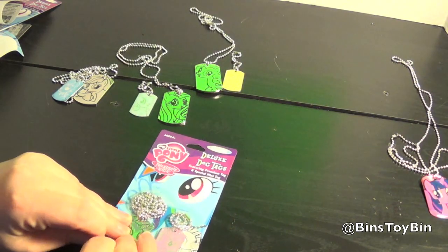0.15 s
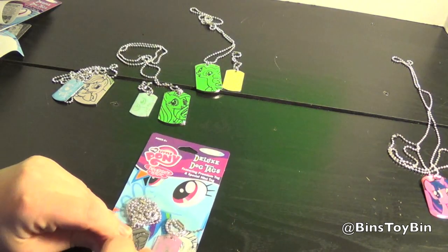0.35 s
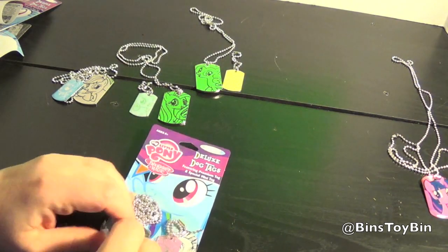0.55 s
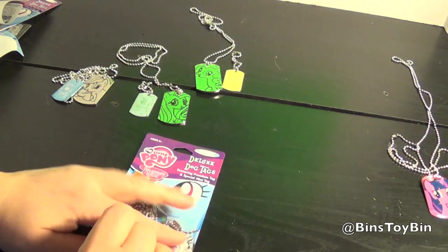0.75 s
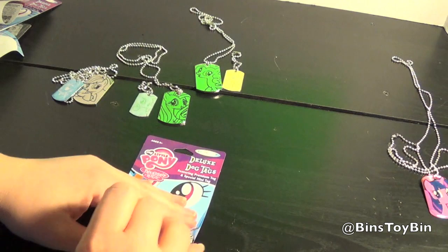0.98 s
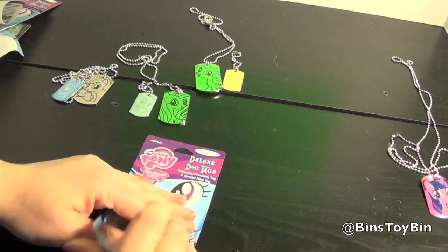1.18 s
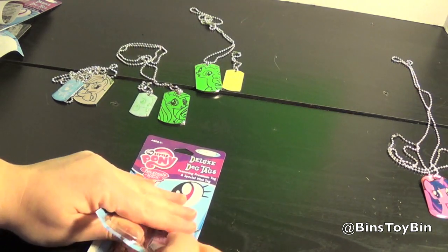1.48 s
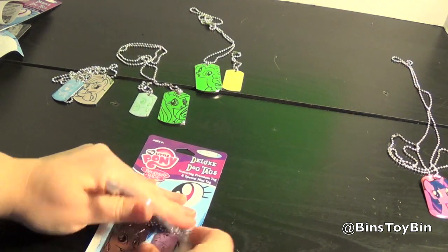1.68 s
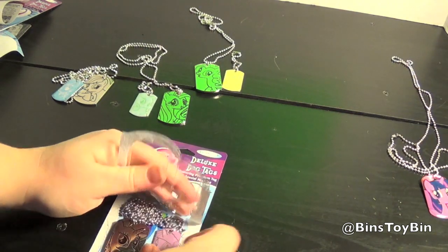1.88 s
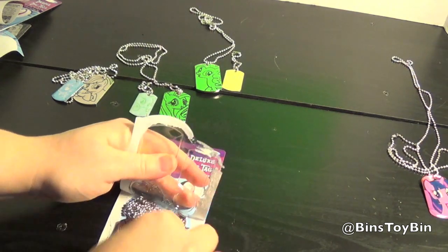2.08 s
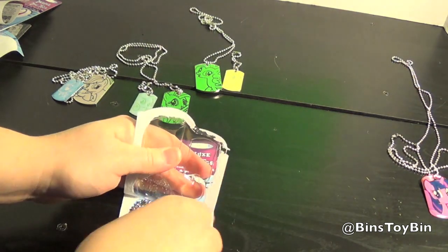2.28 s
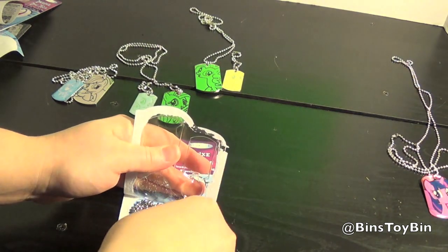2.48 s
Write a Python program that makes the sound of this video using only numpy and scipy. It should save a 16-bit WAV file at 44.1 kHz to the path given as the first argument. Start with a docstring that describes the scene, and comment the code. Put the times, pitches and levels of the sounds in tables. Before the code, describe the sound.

A stiff plastic blister pack is pried open close to the microphone: sharp snaps and tearing crackles in quick bursts, hollow pops, a brief creak midway, soft table thuds, in a small quiet room.

```python
"""In a small quiet room, hands pry open a stiff plastic blister pack on a table, close to the microphone.
The shell snaps and the bubble pops: each is a handful of short damped tones. The glued rim tears off
the card in crackling bursts made of thousands of tiny cracks. The hollow bubble creaks by sticking and
slipping, and the card bumps the table with soft thuds. Decaying noise tails make the room's answer;
filtered noise makes the air and a fuzzy low hum."""
import sys
import numpy as np
from scipy import signal
from scipy.fft import rfft, irfft, next_fast_len
from scipy.io import wavfile
from scipy.ndimage import uniform_filter1d

SR = 44100
rng = np.random.default_rng(int(sys.argv[2]) if len(sys.argv) > 2 else 0)


def boost_factor(decibels):
    """Convert a level in decibels to a linear amplitude factor."""
    exponent = np.asarray(decibels, float) / 20
    return 10 ** exponent


def dump_mix(stems):
    """Bounce the given channels to the path in sys.argv[1] as a 16-bit WAV at rate SR."""
    frames = np.atleast_2d(stems).T  # one column per channel
    limited = np.clip(frames, -1, 1)  # hard clip at full scale
    pcm = np.round(limited * 32767).astype(np.int16)
    wavfile.write(sys.argv[1], SR, pcm)


N = 116865

# Parts of the pack: centre_hz, spread_octaves, ring_cycles, snap_db (added to the level of single snaps)
SHELL = (3529, 0.6677, 4.5, -5)
FILM = (10470, 0.25, 5.65, 4.1)
BUBBLE = (1390, 0.16, 7, -3)
CARD = (650, 0.58, 2.5, -3)
CARD_DB = -7  # the card drums along with the bubble, at this level relative to it


def unit(x):
    """Scales a sound to an rms of 1."""
    return x / np.sqrt(np.mean(x ** 2) + 1e-20)


def along(points, hz):
    """Reads a curve of (Hz, value) points on a log frequency axis."""
    f, v = np.transpose(points)
    return np.interp(np.log(hz + 1), np.log(f + 1), v)


def filtered(x, response):
    """Multiplies the spectrum of x by a response that depends on frequency."""
    m = next_fast_len(N + 8192)
    return irfft(rfft(x, m) * response(np.fft.rfftfreq(m, 1 / SR)), m)[..., :N]


def grains(start_s, hz, cycles, size, count=400):
    """Adds up damped sines that rise over about a cycle and fall by a factor e every cycles / 2 periods."""
    t = np.arange(count) / SR
    turns = np.clip(hz, 50, SR / 2.5)[:, None] * t
    rise = 1 - np.exp(-turns / 0.5)
    rows = size[:, None] * np.sin(2 * np.pi * turns) * np.exp(-2 * turns / cycles) * rise
    at = np.round(start_s * SR).astype(int)[:, None] + np.arange(count)
    return np.bincount(at.ravel(), rows.ravel(), N + SR)[:N]


def air():
    """Room tone and hiss are shaped noise, partly alike in both ears; a narrow band of noise is the hum."""
    # Colour of the air: pitch_hz [Hz], level_db [dB, relative]
    air_colour = [(41, -34), (70, -4), (511, -1.5), (900, -4), (1260, -9.5), (14500, -20)]
    # How alike left and right are: pitch_hz [Hz], likeness [0 to 1]
    air_alike = [(60, .99), (1000, 0.6), (10000, 0.85)]
    air_db, hum_db = -52, -64.5  # rms
    hum_hz, hum_half_width_hz = 51.8, 10.6

    def colour(hz):
        # the angle shares the noise between middle and side
        angle = np.arccos(np.clip(along(air_alike, hz), 0, 1)) / 2
        return boost_factor(along(air_colour, hz)) * [np.cos(angle), np.sin(angle)]

    mid, side = filtered(rng.standard_normal((2, N)), colour)
    hiss = unit(np.array([mid + side, mid - side]))
    hum = filtered(rng.standard_normal(N), lambda hz: 1 / (1 + ((hz - hum_hz) / hum_half_width_hz) ** 4))
    return boost_factor(air_db) * hiss + boost_factor(hum_db) * unit(hum)


def tearing():
    """Fibres and glue let go in thousands of tiny clumped cracks; each excites shell, bubble, film and card."""
    # Bursts of tearing and crinkling: start_s [s], length_s [s], then the levels of three parts:
    # shell_db [dB], bubble_db [dB], film_db [dB]
    bursts = [(0.082, 0.04, -42.5, -61, -43), (0.239, 0.022, -25.5, -38.5, -25.5),
              (0.269, 0.04, -20, -29.5, -22), (0.304, 0.034, -29.5, -41, -34),
              (0.484, 0.066, -34.5, -41.5, -53), (0.592, 0.04, -33, -36, -31),
              (0.669, 0.031, -32.5, -44, -39), (0.722, 0.038, -21.5, -35.5, -25.5),
              (0.784, 0.049, -29.5, -37, -30), (0.833, 0.072, -28, -32.5, -27.5),
              (0.93, 0.039, -33, -35.5, -32.5), (0.986, 0.02, -22.5, -29, -27),
              (1.01, 0.064, -32.5, -41.5, -34), (1.083, 0.065, -39, -45, -39.5),
              (1.14, 0.026, -25, -32, -26.5), (1.176, 0.015, -26.5, -52, -31),
              (1.256, 0.02, -29.5, -29.5, -34.5), (1.308, 0.01, -25.5, -31.5, -31.5),
              (1.331, 0.027, -38, -37.5, -47), (1.389, 0.25, -42.5, -43, -47.5),
              (1.562, 0.07, -33.5, -32, -41.5), (1.626, 0.06, -20.5, -28.5, -31.5),
              (1.695, 0.035, -31, -38, -32), (1.724, 0.019, -20.5, -27, -21),
              (1.747, 0.065, -24.5, -32.5, -23.5), (1.812, 0.067, -34, -52, -30.5),
              (1.945, 0.02, -25.5, -67, -23.5), (1.978, 0.011, -21, -31.5, -23.5),
              (2.005, 0.012, -32, -39, -29), (2.06, 0.15, -38.5, -45, -39),
              (2.228, 0.04, -28.5, -65, -29.5), (2.28, 0.094, -33, -72.5, -28.5),
              (2.33, 0.028, -24, -42, -36), (2.353, 0.04, -35.5, -53, -34.5),
              (2.613, 0.029, -58, -67, -46.5)]
    attack_s, release_s = 0.0036, 0.0041
    rustle_db = -53.5  # a steady rustle in each part, under the bursts
    sizes_db, clumps_db = 2, 1.7  # how unequal single cracks and clumps of 12 are

    start_s, length_s, shell_db, bubble_db, film_db = np.transpose(bursts)[..., None]
    t = np.arange(N) / SR
    rise = np.clip((t - start_s) / attack_s, 0, 1)
    shape = rise * np.exp(-np.clip(t - start_s - length_s, 0, 1) / release_s)

    when = np.sort(rng.uniform(0, N / SR, 12000))
    clumps = np.repeat(rng.standard_normal(1000), 12)
    strength = boost_factor(sizes_db * rng.exponential(1, len(when)) + clumps_db * clumps)

    out = 0
    parts = ((shell_db, SHELL), (bubble_db, BUBBLE), (film_db, FILM), (bubble_db + CARD_DB, CARD))
    for level_db, (hz, spread, cycles, _) in parts:
        place, push = rng.standard_normal((2, len(when)))
        size = strength * push * 2 ** (spread * place / 2)
        cracks = grains(when, hz * 2 ** (spread * place), cycles, size, count=320)
        # most of the slow swings in level are evened out before the bursts are shaped
        even = cracks / np.abs(uniform_filter1d(cracks ** 2, size=900)) ** 0.4
        loudness = (boost_factor(level_db) * shape).max(axis=0) + boost_factor(rustle_db)
        out = out + unit(even) * loudness
    return out


def room(x):
    """Echoes fade as noise tails, drawn anew every eighth of a second as the hands move."""
    # Time to fade by 60 dB: pitch_hz [Hz], fade_s [s]
    fade_times = [(300, 0.23), (1500, 0.12), (5000, 0.19), (12000, 0.089)]
    # Level of the side sound: pitch_hz [Hz], level_db [dB, relative]
    side_level = [(200, -14), (1000, -16), (4000, -3.5), (8000, -15.5)]
    out, step = np.zeros((2, N + SR)), SR // 8
    for start in range(0, N, step):
        hz, t, z = signal.stft(rng.standard_normal((2, SR // 3)), SR, nperseg=256)
        fade = boost_factor(-60 * t / along(fade_times, hz)[:, None])
        tail = signal.istft(z * fade, SR, nperseg=256)[1]
        wet = signal.fftconvolve(x[None, start:start + step], tail / np.linalg.norm(tail[0]), axes=1)
        out[:, start + 60:][:, :wet.shape[1]] += wet  # the answer comes 60 samples late
    mid = out[0, :N]
    side = filtered(out[1, :N], lambda hz: boost_factor(along(side_level, hz)))
    return np.array([mid + side, mid - side])


def snaps():
    """Each snap, tick or pop sets off twelve short tones, spread across the range of the part that moves."""
    # Single snaps of the shell: start_s [s], shell_db [dB], film_db [dB]
    shell_snaps = [(0.2587, -16, -26), (0.3623, -6, -9.5), (0.476, -9, -11.5), (0.4881, -8.5, -15),
                   (0.5162, -18, -26), (0.5376, -8, -21.5), (0.5821, -13, -27), (0.596, -14.5, -16),
                   (0.6023, -5, -31), (0.7863, -11, -10.5), (0.84, -20, -21), (0.8475, -8, -26),
                   (0.9289, -5.5, -24), (0.946, -13, -18.5), (0.9716, -9.5, -15), (1.147, -5, -24),
                   (1.2788, -7.5, -19.5), (1.403, -6, -18.5), (1.5419, -12.5, -25.5), (1.6297, -3.5, -16),
                   (1.7554, -21, -20), (1.771, -17, -12), (1.8106, -18, -13.5), (1.8572, -14.5, -17),
                   (1.8853, -11, -16), (1.8986, -10, -14.5), (1.9329, -14, -16), (1.9691, -10.5, -19),
                   (2.0296, -7, -19), (2.0321, -5.5, -18), (2.0489, -8.5, -18), (2.139, -6, -18),
                   (2.1525, -16, -20), (2.159, -6, -18), (2.2204, -13.5, -23.5), (2.2465, -7, -17.5),
                   (2.3331, -7.5, -10.5), (2.3794, -14, -18), (2.4764, -20.5, -20)]
    # The bubble pops in or out: start_s [s], level_db [dB], pitch_hz [Hz]
    bubble_pops = [(0.537, -15.5, 1390), (0.677, -23.5, 950), (0.928, -16.5, 1150), (0.943, -17.5, 1420),
                   (1, -17, 2220), (1.146, -15, 1610), (1.154, -12.5, 1350), (1.182, -14, 1255),
                   (1.189, -16, 1350), (1.276, -11.5, 1260), (1.311, -35, 1350), (1.403, -11.5, 1290),
                   (1.541, -8.5, 1304)]
    # Fine bright ticks of the thin film: start_s [s], level_db [dB]
    film_ticks = [(0.8193, -24), (0.829, -16), (0.844, -15), (2.129, -20), (2.181, -28), (2.195, -25),
                  (2.263, -21), (2.276, -24), (2.295, -38), (2.301, -27)]
    delay_s, fade_db = 0.001, 0.5  # scale of the tones' delays; loss for each such step of delay

    snap_s, shell_db, film_db = np.transpose(shell_snaps)
    pop_s, pop_db, pop_hz = np.transpose(bubble_pops)
    tick_s, tick_db = np.transpose(film_ticks)
    bubble = (pop_hz[:, None], *BUBBLE[1:])  # every pop has its own pitch
    events = ((snap_s, shell_db, SHELL), (snap_s, film_db, FILM), (tick_s, tick_db, FILM),
              (pop_s, pop_db, bubble), (pop_s, pop_db + CARD_DB, CARD))
    out = 0
    for start_s, level_db, (hz, spread, cycles, snap_db) in events:
        draw = rng.standard_normal((len(start_s), 2, 12))
        late = rng.exponential(1, (len(start_s), 12)) ** 1.3
        place = np.linspace(-1.7, 1.7, 12) + 0.15 * draw[:, 0]
        size = boost_factor(level_db[:, None] + snap_db - fade_db * late)
        size = size * np.sign(draw[:, 1]) * 2 ** (spread * place / 2)
        when = start_s[:, None] + delay_s * late
        tones_hz = hz * 2 ** (spread * place)
        out = out + grains(when.ravel(), tones_hz.ravel(), cycles, size.ravel(), count=900)
    return out


def bumps():
    """The card bumps the table: each soft thud is a cluster of ten short low tones."""
    # Bumps: start_s [s], level_db [dB, before a cut of 5 dB per tone], pitch_hz [Hz]
    table_bumps = [(0.293, -16.5, 510), (0.858, -16, 540), (1.147, -22.5, 208), (1.978, -16, 347),
                   (2.013, -24, 310)]
    start_s, level_db, hz = np.transpose(table_bumps)
    draw = rng.standard_normal((len(start_s), 2, 10))
    when = start_s[:, None] + rng.uniform(0, 0.01813, (len(start_s), 10))
    tones_hz = hz[:, None] * 2 ** (0.3 * draw[:, 0])
    size = boost_factor(level_db[:, None] - 5) * np.sign(draw[:, 1])
    return grains(when.ravel(), tones_hz.ravel(), 3, size.ravel(), count=2000)


def creaks():
    """Stick and slip: slowing, growing, slightly uneven slips of the bubble ring one resonance."""
    start_s, length_s, resonance_hz = 1.557, 0.065, 1360
    first_rate, last_rate = 165, 140  # relative: the slips are stretched to fit the length
    first_db, last_db = -21, -11
    u, draw = np.linspace(0, 1, 11), rng.standard_normal((3, 11))
    gaps = (1 + 0.045 * draw[0]) / (first_rate + (last_rate - first_rate) * u)
    late = (np.cumsum(gaps) - gaps[0]) * length_s / gaps.sum()
    size = boost_factor(first_db + (last_db - first_db) * u + draw[1])
    return grains(start_s + late, resonance_hz * (1 + 0.03 * draw[2]), 4.5, size, count=800)


def scene():
    """The pack reaches two microphone ports, directly and by way of the room; the air is added last."""
    # Phase by which the left port leads: pitch_hz [Hz], lead [radians, negative means it lags]
    port_lead = [(690, -0.5), (1890, -0.85), (4050, -0.034), (8000, -0.25)]
    # Tone of the microphone: pitch_hz [Hz], level_db [dB]
    mic_tone = [(20, -17), (150, -12), (6500, 1), (11500, 1.5), (15000, -10.5)]
    room_db = -8.5
    pack = tearing() + snaps() + bumps() + creaks()
    direct = filtered(pack, lambda hz: np.exp(0.5j * along(port_lead, hz) * [[1], [-1]]))
    close = filtered(direct + boost_factor(room_db) * room(pack), lambda hz: boost_factor(along(mic_tone, hz)))
    return close + air()


def low_pass(x):
    """Removes everything above the highest recorded frequency."""
    return signal.sosfilt(signal.butter(12, 16980, fs=SR, output="sos"), x)


def record(dry):
    """Cuts everything above a top frequency, then softly clips the sharpest cracks."""
    top_hz = 15900
    x = filtered(dry, lambda hz: hz < top_hz)
    clipped = x / (1 + np.abs(x) ** 4) ** (1 / 4)
    return low_pass(clipped)


dry = scene()
out = record(dry)
dump_mix(out)
```